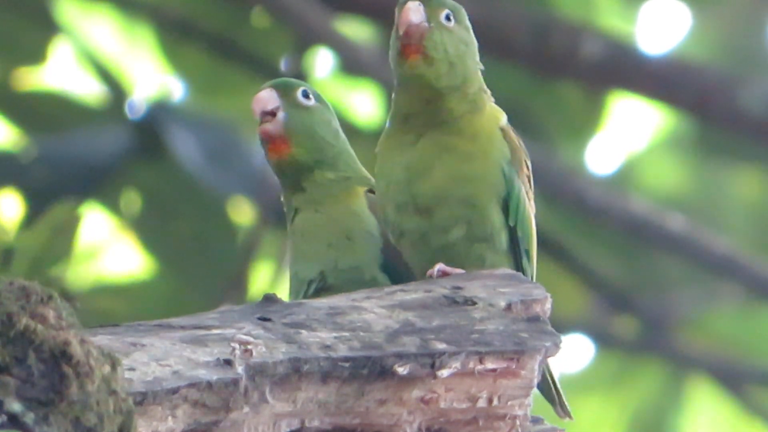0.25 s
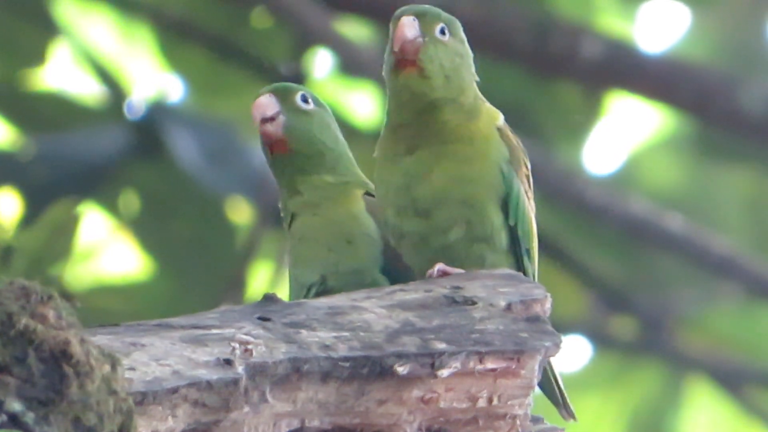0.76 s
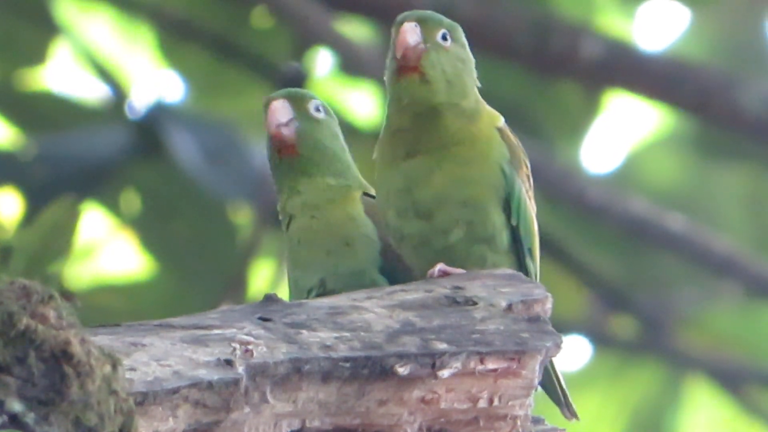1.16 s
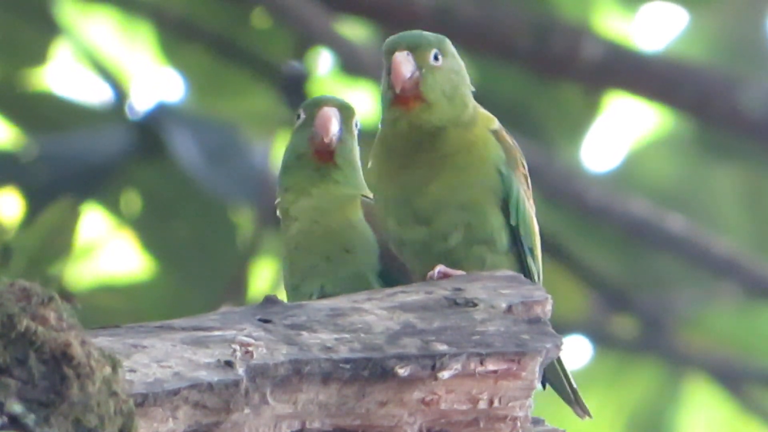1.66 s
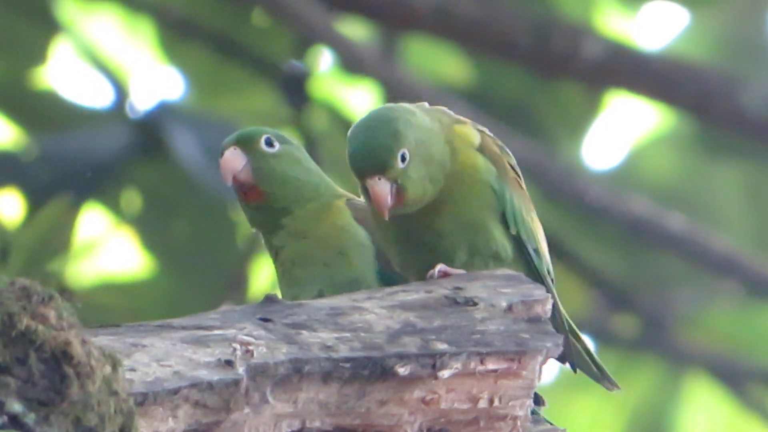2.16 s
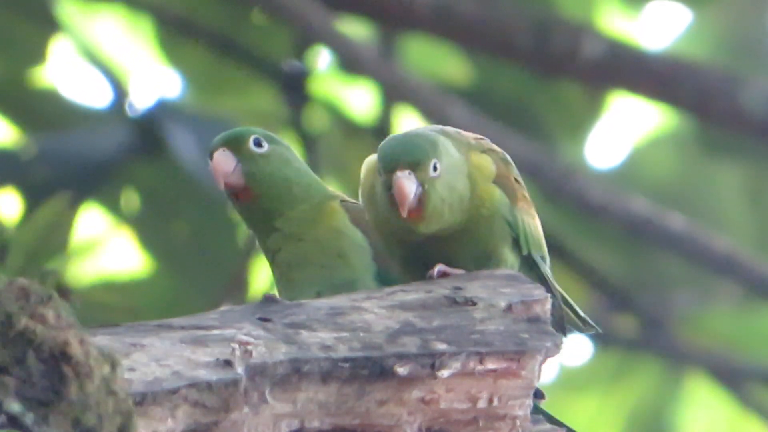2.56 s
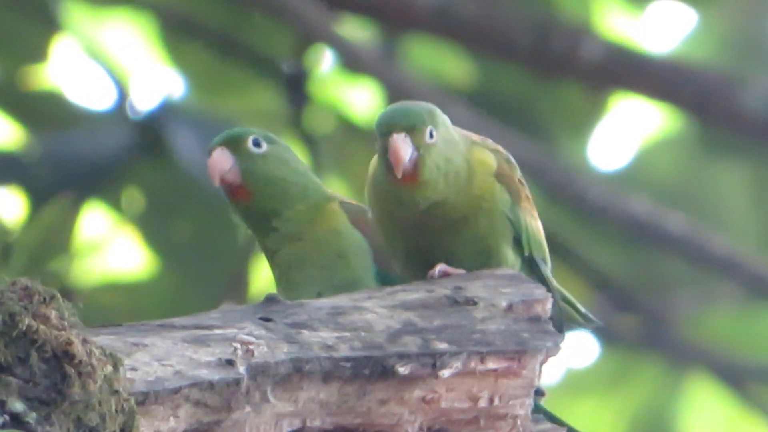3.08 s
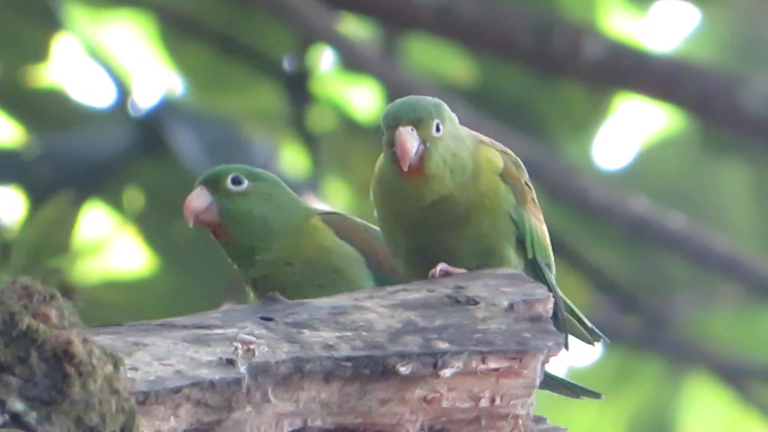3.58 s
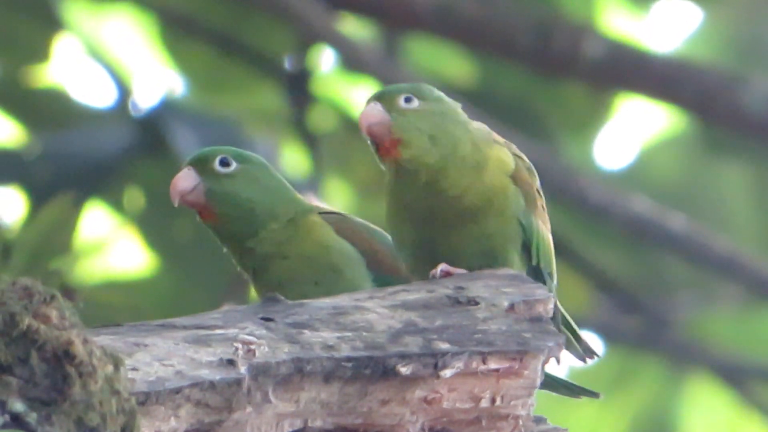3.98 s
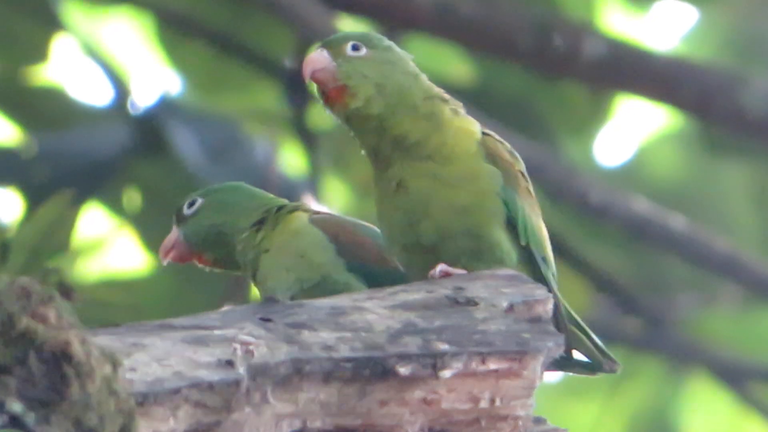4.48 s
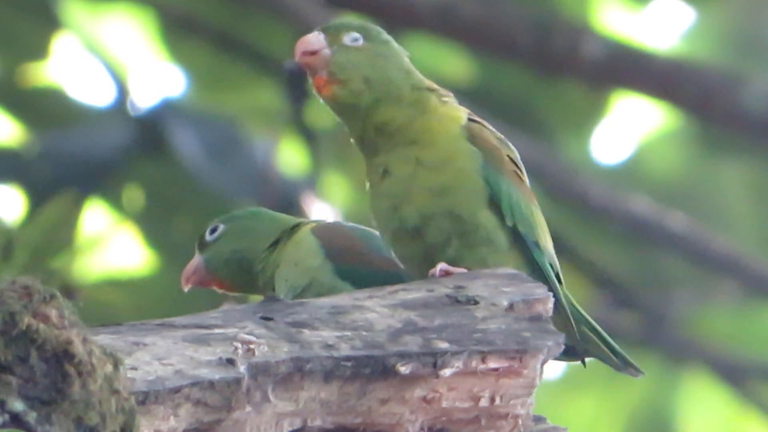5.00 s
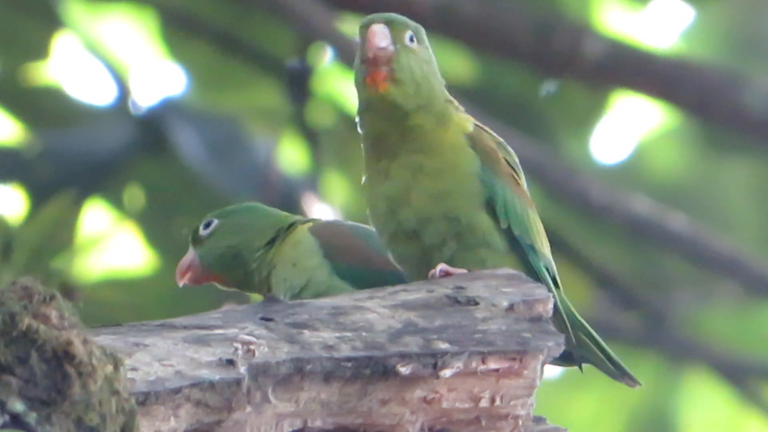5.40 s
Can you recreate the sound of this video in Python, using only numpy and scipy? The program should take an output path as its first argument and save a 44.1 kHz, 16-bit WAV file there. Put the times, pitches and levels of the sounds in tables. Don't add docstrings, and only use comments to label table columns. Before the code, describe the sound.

A forest with small parrots, heard in close stereo over a constant low traffic rumble and gentle leaf hiss. A far engine hums low around 140 Hz and disappears by about 3.7 s. Distant parrots murmur from the start; at 0.3 s a note plunges quickly, followed by soft peeps. Loud harsh squawks come at 0.67 and 0.85 s, a clear chirp at 1.0, then rapid rough notes and a softer chirp until 1.35. A lull holds faint peeps and a dull twig tick at 2.26. At 2.95 others answer with a squawk, then a harsh screech at 3.15. A dove coos twice, very softly, at 3.7 and 4.0. A clean undulating whistle runs from 4.46 to 4.99, followed by a tiny high one; another arches and falls at 5.33. Loud squawks close from 5.39. Bird calls leave fluttering, scattered tails of under a second.

```python
import sys
import numpy as np
from scipy import signal
from scipy.fft import rfft, irfft, next_fast_len
from scipy.io import wavfile

SR = 44100
rng = np.random.default_rng(int(sys.argv[2]) if len(sys.argv) > 2 else 0)


def nominal_scale(level):
    x = np.asarray(level, float) / 20
    return 10 ** x


def master_out(mix):
    frames = np.transpose(np.atleast_2d(mix))
    ceiling = np.clip(frames, -1, 1)
    pcm = np.round(ceiling * 32767).astype(np.int16)
    wavfile.write(sys.argv[1], SR, pcm)


N = 249165
TIME = np.arange(N) / SR


def rms_one(x):
    return x / np.sqrt(np.mean(x ** 2) + 1e-20)


def at_hz(points, hz):
    points_hz, values = np.transpose(points)
    return np.interp(np.log(hz), np.log(points_hz), values)


def drift(rate_hz):
    r = np.exp(-2 * np.pi * rate_hz / SR)
    noise = rng.standard_normal(N + SR)
    return rms_one(signal.lfilter([1], [1, -2 * r, r * r], noise)[SR:])


def bands(per_octave):
    edges = 22 * 2 ** np.arange(0, 9.6, 1 / per_octave)
    return [(np.sqrt(lo * hi), signal.butter(2, [lo, hi], "band", fs=SR, output="sos"))
            for lo, hi in zip(edges, edges[1:])]


def fade(t, length, edge):
    to_nearest_end = np.minimum(t + edge / 2, length + edge / 2 - t)
    return np.sin(np.pi / 2 * np.clip(to_nearest_end / edge, 0, 1)) ** 2


def arriving(x, lag_us, pan_db):
    size = next_fast_len(len(x))
    hz = np.arange(size // 2 + 1) * SR / size
    turn = np.exp(-1j * np.pi * hz * lag_us * 1e-6 * np.array([[1], [-1]]))
    return irfft(rfft(x, size) * turn, size)[:, :len(x)] * nominal_scale([[pan_db / 2], [-pan_db / 2]])


# f/Hz, width/Hz, level/dB
FIXED_RESONANCES = [(2150, 220, -9), (8600, 1300, -28), (1500, 150, -14)]


def notes(rows, width_hz, tilt_db, rough, rasp_db, edge=.006):
    out, shake, flutter = np.zeros(N), drift(215), drift(290)
    rasp_band = signal.butter(2, [2600, 4300], "band", fs=SR, output="sos")
    rasp = rms_one(signal.sosfilt(rasp_band, rng.standard_normal(N)))
    for start, length, from_hz, to_hz, level_db, throat_hz in rows:
        first = max(0, round((start - edge) * SR))
        at = slice(first, min(N, round((start + length + edge) * SR)))
        t = TIME[at] - start
        pitch = np.interp(t, [0, length], [from_hz, to_hz])
        phase = 2 * np.pi * np.cumsum(pitch * (1 + 0.026 * rough * shake[at])) / SR
        k = np.arange(1, 15000 // max(from_hz, to_hz) + 1)[:, None]
        tract = sum(nominal_scale(db) / (1 + ((k * pitch - hz) / width) ** 2)
                    for hz, width, db in [(throat_hz, width_hz, 0)] + FIXED_RESONANCES)
        tract *= 1 - 0.58 / (1 + ((k * pitch - 1780) / 150) ** 2)
        gains = nominal_scale(tilt_db * np.log2(k)) * tract
        stack = np.sum(gains * np.sin(k * phase + k * k), axis=0)
        stack /= np.sqrt(np.sum(gains ** 2, axis=0) / 2)
        voice = (1 + rough * flutter[at]) * stack + nominal_scale(rasp_db) * rasp[at]
        out[at] += nominal_scale(level_db) * fade(t, length, edge) * voice
    return out


def tones(tables, partials_db, wobble, edge):
    out, shake = np.zeros(N), drift(44)
    for rows, shares_db in zip(tables, partials_db):
        s, hz, level_db = np.transpose(rows)
        pitch = np.interp(TIME, s, hz) * (1 + wobble * shake)
        phase = 2 * np.pi * np.cumsum(pitch) / SR
        partials = sum(nominal_scale(db) * np.sin(k * phase) for k, db in enumerate(shares_db, 1))
        level = np.sqrt(2) * nominal_scale(np.interp(TIME, s, level_db))
        out += level * fade(TIME - s[0], s[-1] - s[0], edge) * partials
    return out


def held(rows):
    sag_per_s = 0.13
    return [(s, length, hz * (1 + sag_per_s * length / 2), hz * (1 - sag_per_s * length / 2), db, throat_hz)
            for s, length, hz, db, throat_hz in rows]


def spelled(syllables, calls):
    return [(s + at * pace, length * pace, from_hz * pitch, to_hz * pitch, db + rel_db, throat_hz)
            for s, db, pitch, pace, throat_hz in calls
            for at, length, from_hz, to_hz, rel_db in syllables]


# f/Hz, level/dB per Hz
AIR_SPECTRUM = [(15, -49), (25, -22.5), (53, -0.5), (102, -1.5), (140, -5.5), (241, -9), (451, -16),
                (488, -15.5), (1010, -18), (1460, -23.5), (2590, -27.5), (3440, -28.5), (3820, -33.5),
                (6440, -40.5), (12700, -60), (16500, -90), (22000, -120)]
# f/Hz, likeness (1 = same)
AIR_LIKENESS = [(60, 1.0), (170, 0.96), (500, 0.93), (1460, 0.97), (4220, 0.73), (12200, 0.72)]


def air():
    out, white = 0, rng.standard_normal((2, 2, N + SR))
    swells = [drift(1) for _ in range(4)]
    for k, (hz, sos) in enumerate(bands(3)):
        mid, side = signal.sosfilt(sos, white[k % 2])[:, SR:]
        alike = at_hz(AIR_LIKENESS, hz)
        gain = nominal_scale(at_hz(AIR_SPECTRUM, hz) - 0.05 * swells[k % 4])
        out = out + gain * (np.sqrt(1 + alike) * mid + np.sqrt(1 - alike) * side * [[1], [-1]])
    return nominal_scale(-36.5) * rms_one(out)


# t/s, f/Hz, level/dB
ENGINE_HUM = [
    (0, 138, -39),
    (1.1, 137.7, -43.5),
    (2.33, 141.4, -41.5),
    (3.45, 143.5, -48),
    (3.7, 142, -61),
]


def engine():
    return tones([ENGINE_HUM], [[0]], wobble=0.011, edge=.003)


TICK_TIMES = [
    2.2602,
    2.2597,
    2.262,
    4.657,
]
# peak level/dB, dulled above f/Hz
TICK_SOUNDS = [
    (-20, 460),
    (-26, 3300),
    (-26, 1000),
    (-52, 10000),
]


def ticks():
    out, t = np.zeros(N), TIME[:256]
    for s, (peak_db, dull_hz) in zip(TICK_TIMES, TICK_SOUNDS):
        u = 2 * np.pi * dull_hz * t
        first = round(s * SR)
        out[first:first + len(t)] -= nominal_scale(peak_db) * u * np.exp(1 - u)
    return out


# f/Hz, time to fall 60 dB/s
FOREST_DECAY = [(1500, 1), (3000, 0.69), (4500, 0.94), (7000, 0.78), (11000, 0.81)]


def forest():
    t, tail = TIME[:round(1.4 * SR)], 0
    beside, ahead, left, right = rng.standard_normal((4, len(t)))
    alike = 0.89
    late = np.sqrt(alike) * ahead + np.sqrt(1 - alike) * np.array([left, right])
    early = arriving(beside, 43, -2) * nominal_scale(9.0 - 60 * t / 0.25)
    for hz, sos in bands(1.5)[6:]:
        tail = tail + signal.sosfilt(sos, late + early) * nominal_scale(-60 * t / at_hz(FOREST_DECAY, hz))
    leaves = signal.butter(4, 9800, fs=SR, output="sos")
    tail = signal.sosfilt(leaves, tail) * np.clip(t / 0.00043, 0, 1)
    return tail / np.sqrt(np.sum(tail ** 2) / 2)


def scattered(x, tail):
    return signal.fftconvolve(x[None], tail, axes=1)[:, :N]


def flock():
    draws = rng.random((260, 4))
    favoured_hz = np.array([1020, 1450, 1750, 2100, 2700, 3200])
    pitch = favoured_hz[(draws[:, 1] * 6).astype(int)] * (.92 + .16 * draws[:, 2])
    rows = [(s, .03, hz, hz * (.85 + .3 * bend), 0, 3500)
            for s, hz, bend in zip(draws[:, 0] * N / SR, pitch, draws[:, 3])]
    return notes(rows, width_hz=1100, tilt_db=-4, rough=.4, rasp_db=-6)


# t/s, hold/s, level/dB
FLOCK_BOUTS = [
    (0.1, 0.73, -37),
    (1.108, 0.11, -28),
    (2.84, 0.13, -32),
    (3.362, 0.018, -40),
    (4.67, 0.055, -45),
    (5.035, 0.44, -35.5),
    (5.513, 0.049, -29),
]


def bouts():
    s, hold, db = np.transpose(FLOCK_BOUTS)[:, :, None]
    rise_db = 81 * np.clip(s - TIME, 0, None)
    fall_db = 60 * np.clip(TIME - s - hold, 0, None)
    return np.sqrt(np.sum(nominal_scale(db - rise_db - fall_db) ** 2, axis=0))


# t/s, length/s, start f/Hz, end f/Hz, level/dB
DOVE_COOS = [
    (3.72, 0.28, 456, 443, -45.5),
    (4.037, 0.196, 468, 461.4, -48.5),
]


def dove():
    coos = [[(s, a, db - 4), (s + length / 2, (a + b) / 2, db), (s + length, b, db)]
            for s, length, a, b, db in DOVE_COOS]
    return tones(coos, [[0], [0]], wobble=0.0024, edge=0.043)


# t/s, length/s, f/Hz, level/dB, throat f/Hz
FAR_NOTES = [(0.000, 0.0071, 2032, -31.5, 4150), (0.002, .040, 1470, -47, 3030),
             (.030, 0.029, 1770, -41.5, 3680), (.170, .028, 3064, -44, 3060),
             (.225, .022, 1940, -45.5, 2200), (2.244, .04, 2806, -50, 5900),
             (2.300, 0.052, 2820, -51, 5960), (2.535, 0.033, 1360, -53, 3000),
             (2.560, 0.04, 2062, -43, 3750), (2.590, 0.035, 2703, -47, 4100),
             (2.740, 0.041, 1335, -54.5, 3300), (2.800, 0.16, 2002, -48, 4320),
             (3.340, 0.057, 3080, -49.5, 2900), (4.300, 0.056, 1032, -46.5, 2750),
             (4.350, .066, 1000, -52, 2700), (4.670, 0.045, 2168, -46, 2400),
             (4.890, .013, 1660, -51, 1760), (5.030, .054, 2960, -44, 3000),
             (5.060, 0.041, 1873, -45, 3830), (5.120, 0.016, 2810, -45.5, 3700),
             (5.140, .014, 2060, -42.5, 3330), (5.175, 0.033, 2905, -50, 3200),
             (5.225, 0.044, 1000, -46, 3600), (5.275, 0.067, 1010, -46.5, 3740)]


def far_birds():
    return notes(held(FAR_NOTES), width_hz=950, tilt_db=-1.5, rough=.55, rasp_db=-13)


# t/s, length/s, start f/Hz, end f/Hz, level/dB
THIN_CHIPS = [
    (2.064, 0.023, 8550, 9100, -61),
    (2.085, .026, 9200, 9000, -61.5),
    (4.238, 0.027, 9600, 9150, -66),
    (4.258, .014, 8450, 8400, -63),
]


def chips():
    rows = [(*row, row[3]) for row in THIN_CHIPS]
    return notes(rows, width_hz=1500, tilt_db=0, rough=.7, rasp_db=-40)


def plunge():
    t = np.array([0, .007, .016, .029, .052])
    hz = 1720 + (2970 - 1720) * np.exp(-t / 0.012)
    rows = [(.300 + a, b - a, high, low, -35.5 - 330 * a, high + low + 300)
            for a, b, high, low in zip(t, t[1:], hz, hz[1:])]
    return notes(rows, width_hz=760, tilt_db=3.5, rough=0.092, rasp_db=-5, edge=0.0046)


# t/s, length/s, start f/Hz, end f/Hz, level/dB
SOFT_NOTES = [
    (0.361, 0.0082, 1880, 2440, -35.5),
    (0.363, 0.041, 2335, 2230, -46),
    (0.399, 0.035, 1782, 1526, -36),
    (.430, .016, 1470, 1500, -58),
    (2.082, 0.014, 2214, 2100, -50),
    (2.230, .014, 2680, 2900, -50),
    (3.931, .010, 1122, 1000, -47),
    (3.934, 0.0224, 1005, 962, -42.5),
]


def soft_notes():
    rows = [(*row, max(1.9 * row[2], 3000)) for row in SOFT_NOTES]
    return notes(rows, width_hz=640, tilt_db=0.0, rough=0.16, rasp_db=-15)


# t/s, f/Hz, level/dB
LONG_GLIDE = [
    (4.460, 3250, -43),
    (4.474, 3600, -34),
    (4.49, 3695, -39),
    (4.55, 3500, -31),
    (4.64, 3405, -32.5),
    (4.78, 3600, -31.5),
    (4.83, 3640, -40),
    (4.972, 3795, -32.5),
    (4.986, 3980, -42),
]
# t/s, f/Hz, level/dB
SHORT_GLIDES = [
    [(4.983, 4400, -40), (4.992, 4650, -31.5), (5.012, 4710, -35.5), (5.03, 4670, -39), (5.045, 4400, -48)],
    [(5.334, 2860, -37), (5.346, 3080, -33.5), (5.36, 3175, -30.5), (5.385, 3050, -31.5), (5.41, 2780, -39),
     (5.447, 2330, -35)],
]
# level/dB of the first, second, third
WHISTLE_PARTIALS = [
    (0, -19, -25.5),
    (1.5, -27, -40),
    (-4, 1, -19),
]


def whistles():
    return tones([LONG_GLIDE] + SHORT_GLIDES, WHISTLE_PARTIALS, wobble=.0006, edge=.006)


# offset t/s, length/s, start f/Hz, end f/Hz, level/dB
SQUAWK_SYLLABLES = [
    (0, 0.0348, 1408, 1494, -3),
    (.029, 0.0065, 2228, 2152, 0.5),
    (.058, 0.013, 2142, 2098, 2.8),
    (.078, .020, 3120, 2960, -2),
    (.100, 0.029, 2070, 2052, -9.5),
    (.112, 0.032, 2904, 3054, -14),
]
DIP_SYLLABLES = [
    (.038, 0.0182, 2098, 1720, 0.6),
    (.056, .014, 1743, 1860, -6),
]
SCREECH_SYLLABLES = [
    (0, 0.0192, 1534, 1633, -3),
    (.017, .007, 1710, 2135, 0),
    (.024, .010, 2095, 2350, -2.5),
    (.033, 0.0118, 2790, 2375, -3),
    (.047, .023, 2090, 2304, -3.5),
    (.068, .014, 2255, 2100, -10),
    (.072, 0.0164, 3185, 3000, -2.5),
    (.092, .025, 3010, 2930, -14),
]
# t/s, level/dB, pitch factor, length factor, throat f/Hz
ANSWER_SQUAWK_CALLS = [
    (2.957, -32.5, .98, .85, 3850),
    (5.388, -28, 1.02, .9, 3750),
]
ANSWER_DIP_CALLS = [
    (2.958, -34.5, .98, .9, 3700),
    (5.385, -27, 1.01, 0.93, 3730),
]
ANSWER_SCREECH_CALLS = [
    (3.156, -27, 1.001, 1.001, 4070),
]


def answering_birds():
    rows = spelled(SQUAWK_SYLLABLES, ANSWER_SQUAWK_CALLS)
    rows += spelled(DIP_SYLLABLES, ANSWER_DIP_CALLS)
    rows += spelled(SCREECH_SYLLABLES, ANSWER_SCREECH_CALLS)
    return notes(rows, width_hz=1380, tilt_db=3.2, rough=.18, rasp_db=-9)


# offset t/s, length/s, start f/Hz, end f/Hz, level/dB
CHIRP_SYLLABLES = [
    (0, .030, 2100, 2530, -9),
    (.027, 0.0063, 2505, 3190, -0.5),
    (.033, 0.0176, 3100, 3320, -1.2),
    (.052, 0.031, 2370, 2772, -5),
]
# t/s, level/dB, pitch factor, length factor, throat f/Hz
SQUAWK_CALLS = [
    (0.666, -27.5, 1, 1.03, 4260),
    (.845, -32, 0.95, 0.79, 4240),
]
DIP_CALLS = [
    (.665, -25.5, 0.97, 1.09, 3700),
    (.845, -32, 0.9, 0.73, 3630),
    (1.125, -37.5, 1.001, .95, 3720),
]
CHIRP_CALLS = [
    (.990, -29, 1.001, 1.001, 4470),
    (1.243, -34, .91, 1.05, 5170),
]
# t/s, length/s, f/Hz, level/dB, throat f/Hz
SINGLE_NOTES = [(.892, 0.065, 2021, -40, 4130), (.930, .021, 2890, -36, 3950),
                (1.130, 0.031, 1780, -35.5, 3700), (1.150, 0.023, 1893, -33.5, 4150),
                (1.162, 0.0079, 2725, -31, 3900), (1.180, 0.035, 1756, -35, 3680),
                (1.322, .034, 2470, -50, 5470), (2.976, 0.015, 2120, -38, 3900),
                (2.990, 0.027, 3053, -35.5, 3220), (3.070, 0.076, 2085, -46, 4100),
                (3.148, 0.0083, 3000, -36, 3500), (3.27, .05, 2260, -46, 4500),
                (5.43, 0.035, 1780, -29.5, 3600), (5.438, 0.016, 2163, -28, 4200),
                (5.455, .022, 3130, -26.5, 3200), (1.06, 0.046, 2708, -40.5, 3000),
                (5.465, .03, 1813, -34.5, 3730), (5.485, 0.022, 2057, -31.5, 3950),
                (5.560, 0.027, 2030, -38, 4100)]


def chattering_birds():
    rows = spelled(SQUAWK_SYLLABLES, SQUAWK_CALLS)
    rows += spelled(DIP_SYLLABLES, DIP_CALLS)
    rows += spelled(CHIRP_SYLLABLES, CHIRP_CALLS)
    rows += held(SINGLE_NOTES)
    return notes(rows, width_hz=1010, tilt_db=2.5, rough=.18, rasp_db=-9)


def scene():
    tail = forest()
    murmur = nominal_scale(-6.0) * bouts() * rms_one(scattered(flock(), tail))
    low = dove() + engine() + ticks()
    far = far_birds()
    quiet = soft_notes() + plunge() + chips()
    whistle = whistles()
    answer = answering_birds()
    chatter = chattering_birds()

    direct = arriving(chatter, 43, -3) + arriving(answer, 43, -2)
    direct += arriving(quiet, -3, 0) + arriving(whistle, -44, 2.5)
    direct += arriving(nominal_scale(-7) * far, -8, 0)

    into_forest = nominal_scale(-1.0) * chatter + nominal_scale(-1.5) * answer + nominal_scale(-2.0) * quiet
    into_forest += nominal_scale(-10) * whistle + nominal_scale(1) * far
    return direct + scattered(into_forest, tail) + murmur + low + air()


def low_pass(x):
    return signal.sosfilt(signal.butter(12, 15200, fs=SR, output="sos"), x)


def record(dry):
    return low_pass(dry)


dry = scene()
out = record(dry)
master_out(out)
```